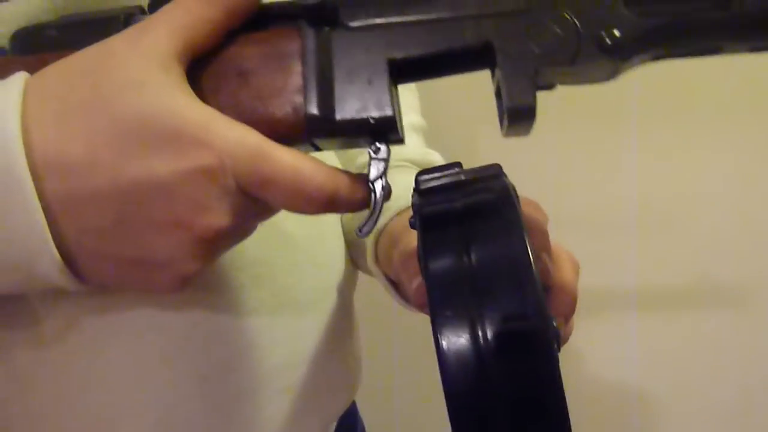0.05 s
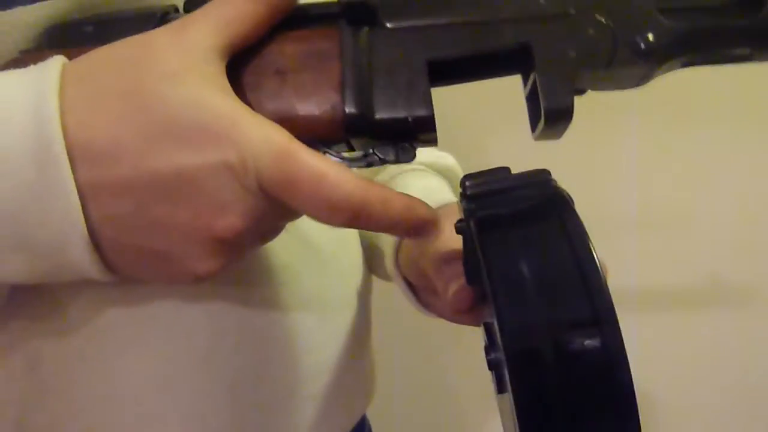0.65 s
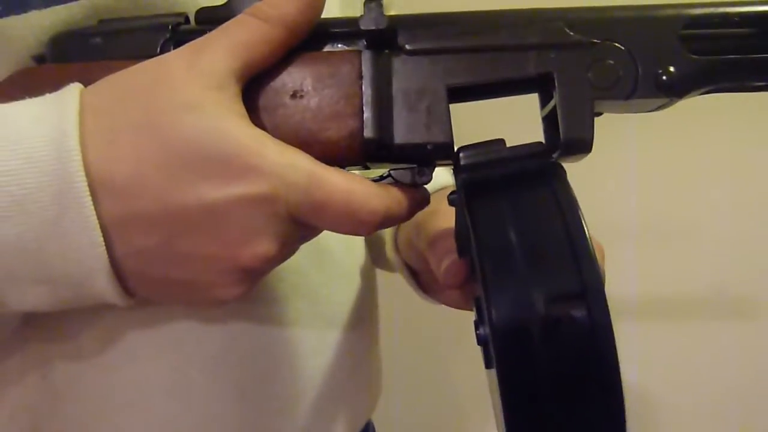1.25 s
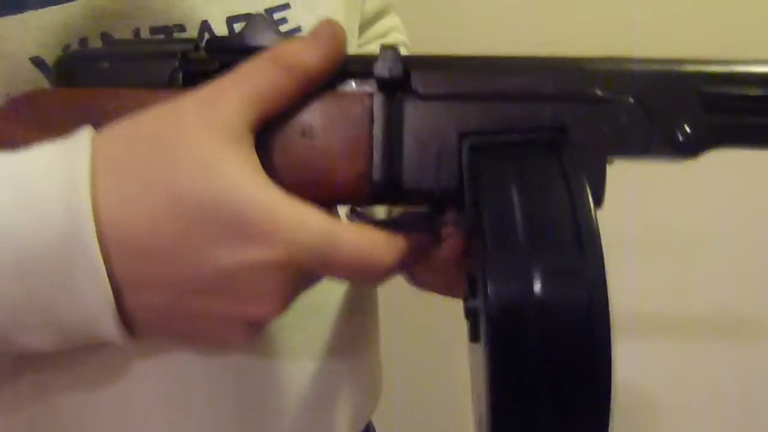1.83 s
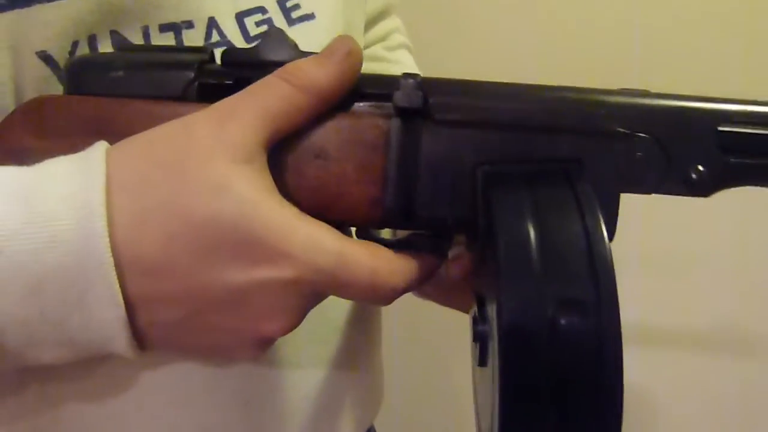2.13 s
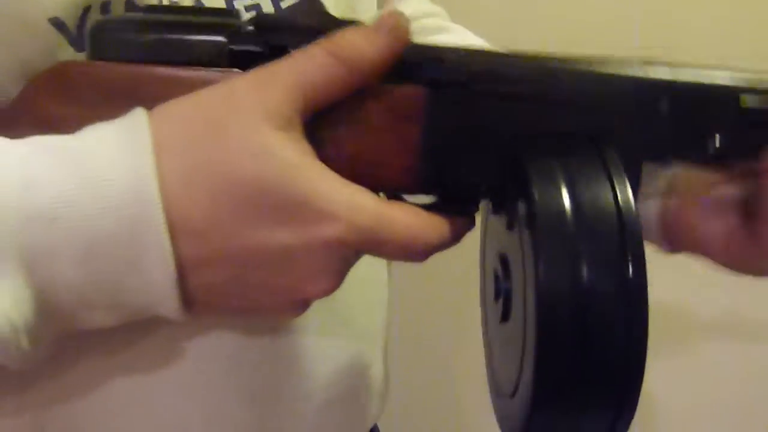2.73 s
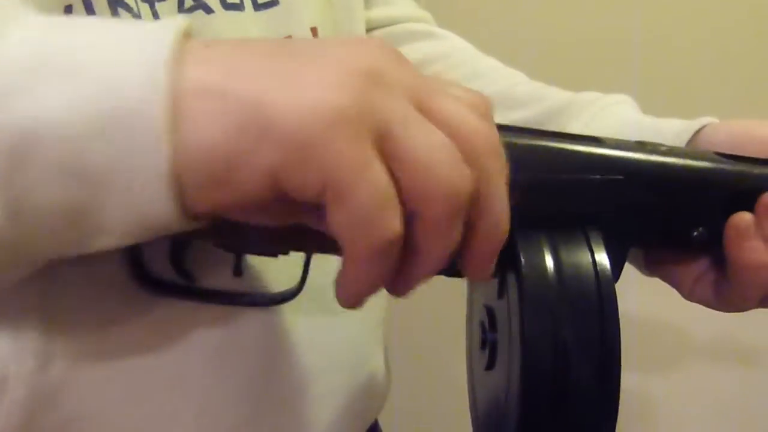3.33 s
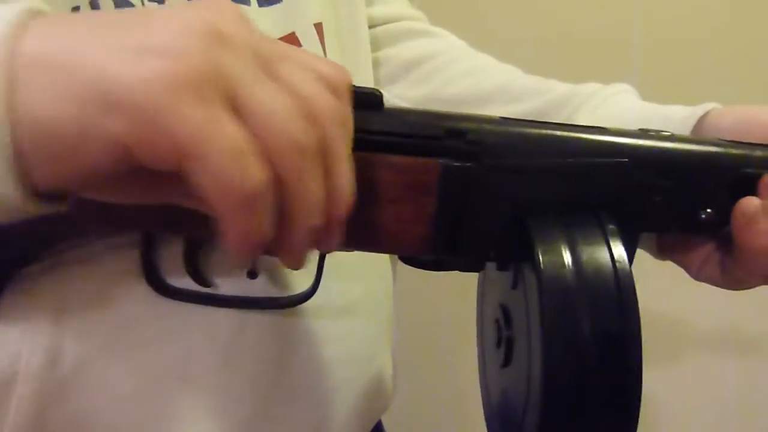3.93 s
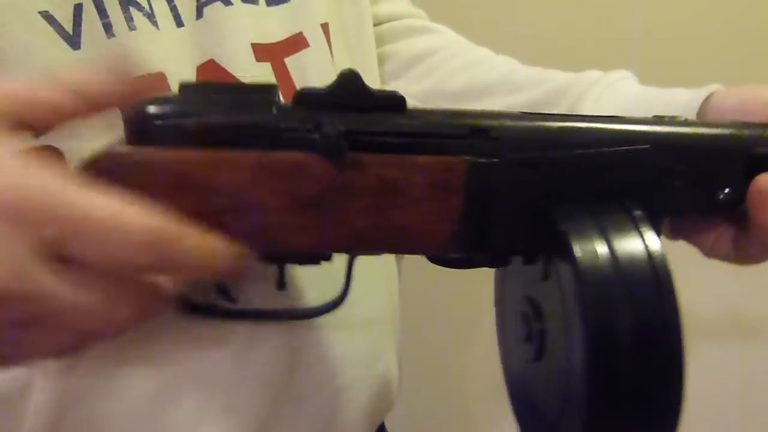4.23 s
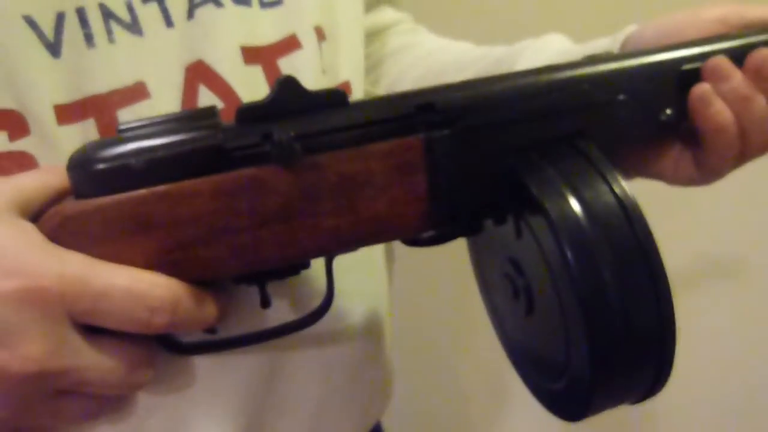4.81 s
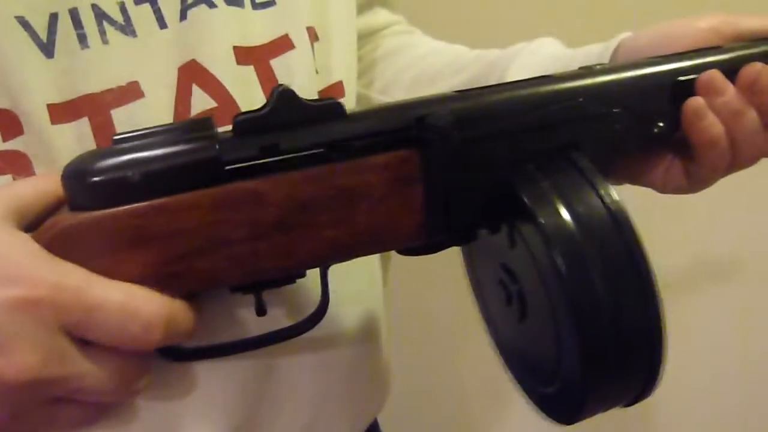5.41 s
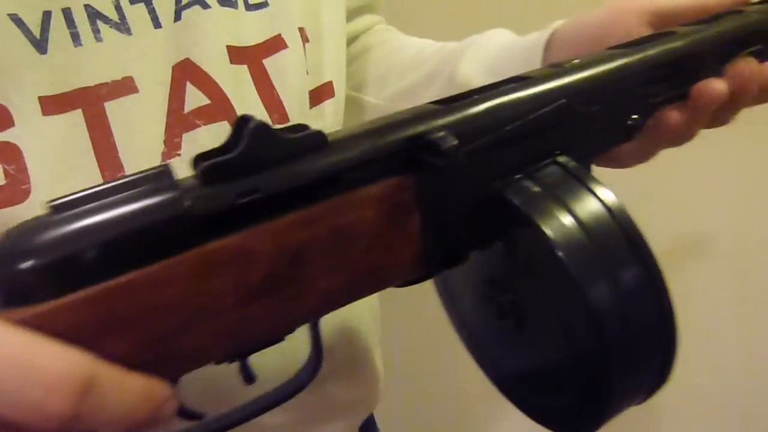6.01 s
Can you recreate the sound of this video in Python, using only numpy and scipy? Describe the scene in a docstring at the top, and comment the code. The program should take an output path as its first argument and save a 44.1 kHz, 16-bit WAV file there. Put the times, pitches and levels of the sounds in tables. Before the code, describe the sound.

A replica submachine gun is handled close to the microphone in a bare room. Tiny metal ticks lead to a crisp snap of the magazine catch at 0.4 seconds. From 1.0 a drum magazine knocks into its well several times with a slight hollow ring, scrapes briefly, and locks with a loud, sharp clack at 1.8. After a pause, faint taps come near 2.9. From 3.3 the bolt is drawn back, steel sliding on steel with several sharp clicks, catching at 3.85. Small handling clicks follow between 4.7 and 5.2. At 5.3 the bolt rattles forward and slams home with a bright clack, the loudest sound. Each hard blow leaves a hissy echo lasting about a second. A sleeve brushes softly now and then, over a faint room hush and a thin, barely audible whine.

```python
"""Replica submachine gun in a bare room

Close by, the catch snaps open, a drum magazine knocks into the well and locks, and the bolt is drawn
back and later slams home. Steel parts chatter, slide and ring; a sleeve brushes over a faint hush and
whine. The gain control ducks on each hard blow and recovers about as fast as the room dies away,
so the echo hangs on as a hiss."""
import sys
import numpy as np
from scipy import signal
from scipy.io import wavfile
from scipy.ndimage import uniform_filter1d

SR = 44100
rng = np.random.default_rng(int(sys.argv[2]) if len(sys.argv) > 2 else 0)


def unload_wav(signal):
    """Save mono or channel-first audio to the path in sys.argv[1] as 16-bit WAV at rate SR, clipped to [-1, 1]."""
    wavfile.write(
        sys.argv[1],
        SR,
        np.round(np.clip(np.atleast_2d(signal).T, -1, 1) * 32767).astype(np.int16),
    )


N = 267357
BANDS_HZ = 31.25 * 2 ** np.arange(.25, 9, .5)
DIRECTIONS = 4   # of radiation from the gun

# Gun parts. Each entry: crack roll-off in Hz, then modes as frequency in Hz, level in dB, T60 in seconds.
GUN_PARTS = { "catch": (30000, [(619, 7, 0.033), (1487, -3, 0.011), (2094, -19.5, 0.016),
             (11380, -7.5, 0.0062)]), "drum": (4600, [(264, -13.5, 0.13), (700, -10.5, 0.23),
             (1015, -12, 0.024), (2193, -15.5, 0.035), (2305, -3.5, 0.11), (3020, -25, 0.25)]),
             "edge": (4000, [(1030, 6, .05), (2340, -3, .08), (5250, -11, .3)]),
             "grip": (2700, [(1413, -1.5, 0.02), (1667, -4, 0.046)]), "lip": (8200, [(2346, 8.5, 0.017),
             (2372, 7.5, 0.063)]), "well": (9100, [(266, -8.5, 0.086), (647, -5, 0.042),
             (1039, -6.5, 0.081), (1490, -8, 0.073), (2150, -1.5, 0.037)]), "rim": (4300, [(274, -18, 0.13),
             (640, -11, 0.42), (805, -6.5, 0.074), (1020, -14, 0.056), (1300, -9.5, 0.046),
             (1413, -4, 0.14), (2100, -10.5, 0.038)]), "lock": (60000, [(728, -20, 0.154),
             (1040, -11.5, 0.034), (1460, -16.5, 0.02), (2074, -12.5, 0.035), (2478, -7.5, 0.036),
             (5140, -20, 0.0014), (9000, -8, 0.0079)]), "sear": (7500, [(130, 3.5, 0.013), (713, 9, 0.075),
             (1384, 1.5, 0.032), (1697, -5.5, 0.033), (5760, -10, .004), (6530, -8, 0.016),
             (9260, -6, 0.044), (9350, -7, 0.028)]), "frame": (12500, [(910, -10.5, 0.0237),
             (1220, -19, 0.038), (1920, -25.5, 0.02), (5040, -4, 0.024)]),
             "notch": (9500, [(730, -6, 0.034), (1224, -7, 0.017), (1440, -12.5, 0.2), (1840, -11.5, 0.028),
             (4860, -7, 0.0097), (6700, -6, 0.003), (7500, -9.5, 0.0048), (8430, -8.5, .018)]),
             "guide": (6700, [(900, -9, 0.014), (1446, -11, 0.028), (1790, -12.5, 0.0087),
             (1950, -9.5, 0.028), (2266, -12.5, 0.058), (2450, -13.5, 0.022), (5400, -9.5, .012)]),
             "lever": (6000, [(817, 2, 0.041), (2310, -16, 0.12)]), "receiver": (1800, [(860, -6, 0.023),
             (1030, -1.5, 0.045), (1416, -2, 0.023), (1610, -5, 0.017)]), "stock": (5600, [(215, 10, 0.24),
             (878, 19, 0.048)]), "trigger": (5900, [(1706, 7, 0.033), (2320, 6.5, 0.1), (2490, 2, 0.051),
             (7140, 0.5, 0.05), (8400, -11.5, 0.078)]), "bolt": (7500, [(2170, -9.5, 0.063),
             (5970, -10.5, 0.001), (7000, -14.5, 0.0088)])}


def contacts(mode_spread_db=1.0, mode_split=.006, steel_top_db=-14, level_window_s=.003):
    """Each blow is a burst of chatter plus the struck part's modes, different in each direction."""
    # Blows of catch, drum and bolt. Each row: start in seconds, part, level, thud and brightness in dB.
    blows = [ (0.061, "lever", -33.5, -31.5, 5), (.108, "lever", -35.5, -20, 4),
             (0.164, "lever", -36, -10, 8), (.187, "lever", -34.5, -17.5, 4.5),
             (.411, "catch", -2.5, -22, 3.5), (.990, "drum", -20.5, -0.5, -4.5),
             (0.9955, "edge", -25.5, -2.5, -4), (1.036, "well", -30, 11.5, -7),
             (1.0625, "rim", -28, 6.5, -8.5), (1.289, "drum", -11.5, -3, 5), (1.35, "well", -27, 6.5, 3.5),
             (1.516, "rim", -16, 5, -3), (1.653, "lip", -29.5, 7, 8.5), (1.743, "lip", -31, -19.5, -3),
             (1.7612, "lip", -14.5, -3, -3), (1.7897, "lock", 4.5, -2.5, 8),
             (2.822, "guide", -44.5, -9, -23), (2.881, "guide", -42.5, -11, -6),
             (2.892, "receiver", -42, 6, -29), (2.914, "receiver", -38.5, 0.5, -29),
             (2.945, "frame", -45, 7, 1.5), (3.2845, "frame", -20, -3, -18.5),
             (3.32, "well", -24, -3.5, -17), (3.3515, "bolt", -12, -9.5, 1),
             (3.416, "stock", -36.5, -11, 3.5), (3.452, "guide", -7.5, -18, -4),
             (3.532, "sear", -5, -25.5, 8), (3.5804, "frame", -2.5, -18, -8.5),
             (3.849, "notch", -2, -12.5, -0.5), (4.6735, "grip", -25, -13.5, 1),
             (4.953, "bolt", -32.5, -10, -35), (5.090, "trigger", -42.5, -4, 5),
             (5.168, "lever", -27.5, -16, -6), (5.308, "guide", -15.5, 5, 1.5),
             (5.3101, "receiver", -3, -16.5, 2.5), (5.3182, "frame", -5.5, -13.5, -6),
             (5.3468, "bolt", 14.5, -12, 11.5)]
    # Chatter T60 in seconds by part; loose parts chatter longer than sprung ones.
    chatter_t60_s = {"catch": .007, "drum": .06, "edge": .04, "grip": .013, "lip": .05, "well": .055, "rim":
                     .05, "lock": .028, "sear": .016, "frame": .019, "notch": .019, "guide": .016, "lever":
                     .028, "receiver": .013, "stock": .05, "trigger": .04, "bolt": .018}
    blows = blows + rattles()
    t = np.arange(SR // 4) / SR
    short = len(t) // 4
    envelopes = np.array([attack(t[:short], bright_db) * decay(t[:short], chatter_t60_s[part])
                          for _, part, _, _, bright_db in blows])
    bursts = rng.standard_normal((len(blows), 2, DIRECTIONS, short)) * envelopes[:, None, None]
    cracks = np.stack([unit_energy(band(bursts[:, k % 2], hz)) for k, hz in enumerate(BANDS_HZ)], axis=1)
    chatter, steel_drive, rings = np.zeros((3, DIRECTIONS, N + len(t)))
    for crack, (start_s, part, *blow) in zip(cracks, blows):
        level_db, _, bright_db = blow
        top_hz, modes = GUN_PARTS[part]
        at = round(start_s * SR)
        burst = np.tensordot(force(BANDS_HZ, *blow) * crack_colour(top_hz), crack, axes=1)
        chatter[:, at:at + short] += burst
        # harder blows press the parts together and ring the steel no louder
        steel_drive[:, at:at + short] += burst * min(1, from_db(steel_top_db - level_db))
        for hz, mode_db, t60_s in modes:
            # close partials beat, differently with each grip
            partials = np.sin(2 * np.pi * np.outer(rng.normal(hz, hz * mode_split, size=3), t))
            ring = unit_energy(sum(partials) * attack(t, bright_db) * decay(t, t60_s))
            polarity = np.sign(rng.standard_normal(DIRECTIONS))
            lobes = polarity * from_db(mode_spread_db * rng.standard_normal(DIRECTIONS))
            rings[:, at:at + len(t)] += force(hz, *blow) * from_db(mode_db) * np.outer(lobes, ring)
    return (chatter + sheet_steel(steel_drive, t) + rings)[:, :N] * np.sqrt(level_window_s * SR)


def rattles(knocks_per_s=160, jitter=.32, spread_db=8):
    """A moving part rattles in its guide: quick, uneven knocks, returned as rows of blows."""
    # Each row: start and end in seconds, part, level and thud in dB.
    runs = [(1.774, 1.784, "receiver", -19, -2.5), (4.971, 4.99, "well", -59, 3),
            (5.327, 5.347, "receiver", -17.5, -5.5)]
    knocks = []
    for start_s, end_s, part, level_db, thud_db in runs:
        for even_s in np.arange(start_s + .5 / knocks_per_s, end_s, 1 / knocks_per_s):
            at_s = even_s + jitter * rng.uniform(-1.1, 1) / knocks_per_s
            knocks.append((at_s, part, level_db + rng.normal(0, spread_db), thud_db, 0))
    return knocks


def sheet_steel(drive, t, mode_count=180, range_hz=(2500, 13000), t60_s=.11, gain_db=-9):
    """The sheet steel's many weak, close modes answer each crack with a faint ring."""
    partials = np.sin(2 * np.pi * np.outer(rng.uniform(*range_hz, mode_count), t)) * decay(t, t60_s)
    body = unit_energy(rng.standard_normal((DIRECTIONS, mode_count)) @ partials)
    return from_db(gain_db) * signal.fftconvolve(drive, body, axes=1)[:, :N + len(t)]


def slides(catches_per_s=400, grain_db=7, top_hz=8000):
    """Steel drags over steel in tiny uneven catches, which keep the part's modes ringing."""
    # Each row: start and end in seconds, part, level, thud and brightness in dB.
    drags = [(1.612, 1.785, "lip", -57, -0.5, 9), (3.373, 3.542, "guide", -26, -9.5, -6.5),
             (3.577, 3.87, "frame", -34, -8, -7.5), (5.317, 5.344, "bolt", -23, 1.5, 8)]
    out = np.zeros((DIRECTIONS, N))
    t = np.arange(SR // 3) / SR
    for start_s, end_s, part, *pressure in drags:
        roughness = np.interp(t * catches_per_s, np.arange(len(t)), rng.uniform(-0.68, 1, len(t)))
        grains = from_db(grain_db * roughness) * (t < end_s - start_s)
        body = 0
        for k, (hz, mode_db, t60_s) in enumerate(GUN_PARTS[part][1]):
            mode = unit_energy(np.sin(2 * np.pi * hz * t) * decay(t, t60_s))
            body = body + force(hz, *pressure) * from_db(mode_db) * mode * (-1) ** k
        friction = grains * rng.standard_normal((DIRECTIONS, len(t)))
        ring = signal.fftconvolve(friction, body[None], axes=1)[:, :len(t)]
        scrape = noise(force(BANDS_HZ, *pressure) * crack_colour(top_hz), grains, channels=DIRECTIONS)
        at = round(start_s * SR)
        out[:, at:at + len(t)] += ring + scrape
    return out


def force(hz, level_db, thud_db, bright_db, thud_hz=780, body_hz=1790, bright_hz=4520):
    """Heavy contacts are rich in bass, hard ones in treble."""
    return from_db(level_db + at_hz([(thud_hz, thud_db), (body_hz, 0), (bright_hz, bright_db)], hz))


def attack(t, bright_db, rise_s=.0003, doubling_db=7, longest_s=.0012):
    """A dull contact is a soft one and takes longer to build."""
    return -np.expm1(-t / min(rise_s * 2 ** (-bright_db / doubling_db), longest_s))


def crack_colour(top_hz):
    """Band gains of the dense steel modes, fading above top_hz."""
    # Each row: frequency in Hz, relative level in dB per half octave.
    spectrum = [(40, -58.5), (120, -34), (250, -20), (400, -18.5), (650, -10), (1700, -10), (3700, -11.5),
                (5800, -9.5), (10000, -7), (15000, -11.5)]
    return from_db(at_hz(spectrum, BANDS_HZ)) / np.hypot(1, np.square(BANDS_HZ / top_hz))


def room(rays, build_s=.0011, wall_lag_s=.0083, wall_db=-8.5, scatter_t60_s=.048):
    """Mid and side of the direct sound, a near wall's scatter and an echo whose treble dies first."""
    # Each row: frequency in Hz, T60 in seconds.
    echo_t60_s = [(100, 0.83), (300, 1), (1000, 0.97), (2500, 1), (5000, 0.87), (8000, 0.7), (14000, 0.33)]
    # Each row: frequency in Hz, echo energy against direct in dB.
    echo_db = [(100, -13.5), (300, -4.5), (1000, -3), (2500, -6), (6000, -7), (14000, -7.5)]
    direct_side_db, echo_side_db = -10.5, -4
    t = np.arange(SR) / SR
    white = rng.standard_normal((2, 2, DIRECTIONS, SR))
    response = 0
    for k, hz in enumerate(BANDS_HZ):
        envelope = unit_energy(decay(t, at_hz(echo_t60_s, hz)) * (1 - np.exp(-t / build_s)))
        response = response + band(white[k % 2], hz) * (envelope * from_db(at_hz(echo_db, hz)))
    echo = signal.fftconvolve(rays[None], response, axes=2).sum(axis=1)[:, :N] / np.sqrt(DIRECTIONS)
    scatter = unit_energy(rng.standard_normal((2, SR)) * decay(t, scatter_t60_s))
    wall = signal.fftconvolve(rays[-2:], scatter, axes=1)
    wall = np.pad(wall, ((0, 0), (round(wall_lag_s * SR), 0)))[:, :N]
    direct = from_db([[0], [direct_side_db]]) * rays[:2]
    return direct + from_db(wall_db) * wall + from_db([[0], [echo_side_db]]) * echo


def sleeve(rise_db_per_s=32.5, fall_db_per_s=46.5, rest_db=-63, gain_db=-7):
    """Cloth brushes past with each move of the arm, over its faint rustle at rest."""
    # Each row: fastest moment in seconds, relative level in dB.
    brushes = [(0.361, -55.5), (2.68, -56.5), (3.3, -52.5), (4.33, -49.5)]
    # Each row: frequency in Hz, relative level in dB per half octave.
    spectrum = [(100, -15.5), (400, -12.5), (1500, -2.5), (6000, -1), (12000, -4), (16000, -13)]
    t = np.arange(N) / SR
    strokes = [from_db(db - np.maximum(rise_db_per_s * (peak_s - t), fall_db_per_s * (t - peak_s)))
               for peak_s, db in brushes]
    envelope = np.sqrt(from_db(rest_db) ** 2 + np.sum(np.square(strokes), axis=0))
    return noise(from_db(at_hz(spectrum, BANDS_HZ) + gain_db), envelope)


def hush():
    """Steady noise of the room."""
    # Each row: frequency in Hz, level in dB per half octave.
    spectrum = [(30, -70), (100, -82), (200, -72.5), (400, -69), (1000, -67.5), (2200, -76.5),
                (5000, -102.5), (10000, -77.5), (16000, -88)]
    return noise(from_db(at_hz(spectrum, BANDS_HZ)), np.ones(N))


def whine(centre_hz=1163, wander_hz=11, wanders_per_s=60, rms_db=-62):
    """A faint tone wavers in pitch."""
    t = np.arange(N) / SR
    pitch_hz = centre_hz + wander_hz * np.interp(t * wanders_per_s, np.arange(N), rng.standard_normal(N))
    return from_db(rms_db) * np.sqrt(2) * np.sin(2 * np.pi * np.cumsum(pitch_hz) / SR)


def from_db(db):
    return 10 ** (np.asarray(db) / 20)


def at_hz(points, hz):
    """Interpolate on a log-frequency axis."""
    points_hz, values = np.transpose(points)
    return np.interp(np.log(hz), np.log(points_hz), values)


def unit_energy(x):
    return x / np.sqrt(np.sum(x ** 2, axis=-1, keepdims=True) + 1e-20)


def decay(t, t60_s):
    return np.exp(-np.log(1000) * t / t60_s)


def high_pass(x, hz, order=2):
    return signal.sosfilt(signal.butter(order, hz, "high", fs=SR, output="sos"), x + 1e-18)


def band(x, hz):
    """Half-octave band-pass."""
    edge = 2 ** .25
    return signal.sosfilt(signal.butter(2, [hz / edge, hz * edge], "band", fs=SR, output="sos"), x + 1e-18)


def noise(gains, envelope, channels=2):
    """Independent noises under an envelope, one gain per band."""
    white = rng.standard_normal((2, channels, len(envelope))) * envelope
    power_share = BANDS_HZ * np.pi / 4 / SR
    weights = gains / np.sqrt(power_share)
    return sum(weights[k] * band(white[k % 2], hz) for k, hz in enumerate(BANDS_HZ))


def stereo(mid, side, bass_db=-17, treble_db=2.0, corner_hz=3500):
    """Two close capsules agree in the bass and differ in the treble."""
    side = from_db(bass_db) * side + from_db(treble_db) * high_pass(side, corner_hz, order=1)
    return np.array([mid + side, mid - side])


def scene(radiation_hz=150):
    """The gun in its room; small parts radiate little bass."""
    gun = high_pass(contacts() + slides(), radiation_hz)
    return stereo(*room(gun)) + stereo(*(sleeve() + hush())) + whine()


def record(dry, low_cut_hz=100, stopband_hz=16500, ceiling=.92):
    """Gain control ducks fast and recovers steadily; peaks are rounded, low bass and top treble cut."""
    threshold_db, detect_s, attack_s, release_db_per_s = -5, .0012, .00016, 69
    power = uniform_filter1d(np.mean(dry ** 2, axis=0), round(detect_s * SR))
    over_db = np.maximum(10 * np.log10(np.maximum(power, 1e-12)) - threshold_db, 0)
    recovery_db = release_db_per_s * np.arange(N) / SR
    duck_db = np.maximum.accumulate(over_db + recovery_db) - recovery_db
    pole = np.exp(-1 / (attack_s * SR))
    ducked = dry * from_db(-signal.lfilter([1 - pole], [1, -pole], duck_db))
    rounded = ducked / (1 + (ducked / ceiling) ** 4) ** .25
    high_cut = signal.cheby2(18, 70, stopband_hz, fs=SR, output="sos")
    return signal.sosfilt(high_cut, high_pass(rounded, low_cut_hz))


dry = scene()
out = record(dry)
unload_wav(out)
```